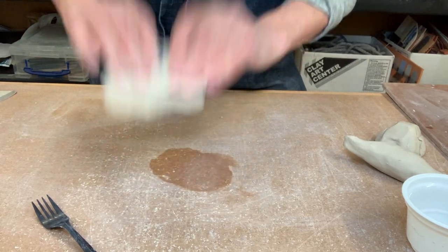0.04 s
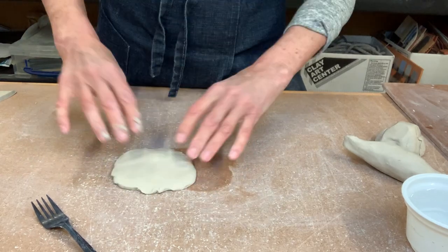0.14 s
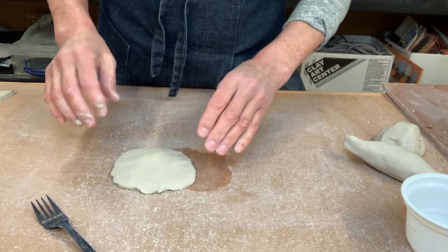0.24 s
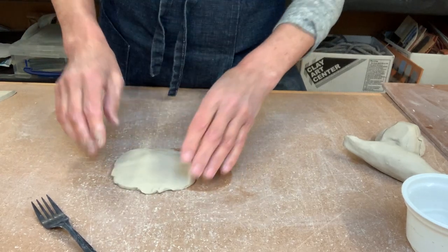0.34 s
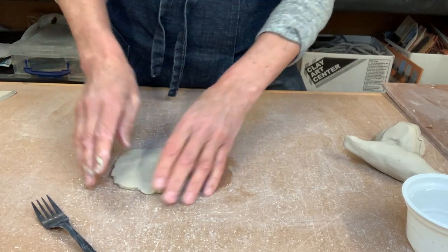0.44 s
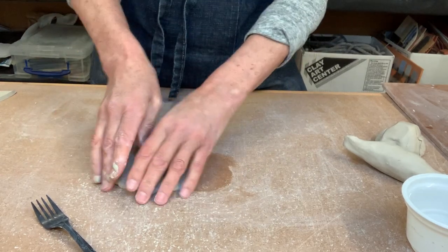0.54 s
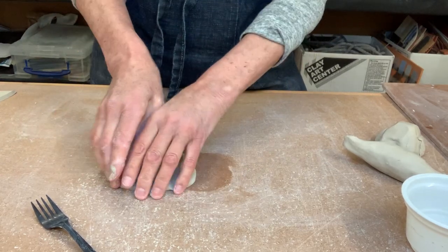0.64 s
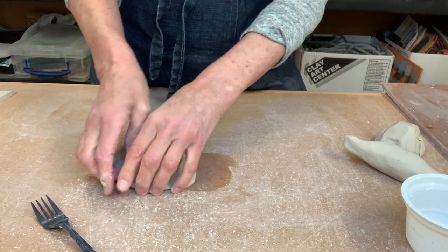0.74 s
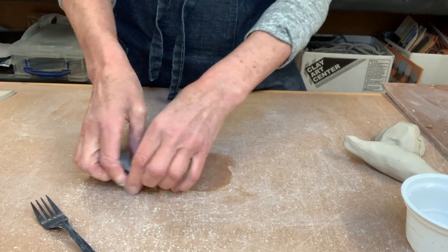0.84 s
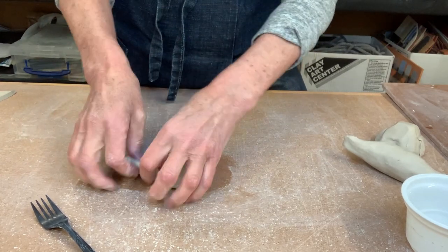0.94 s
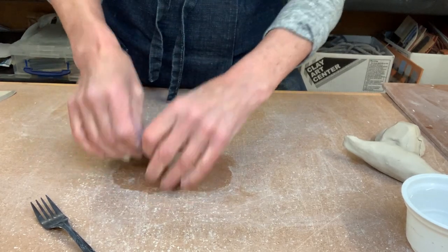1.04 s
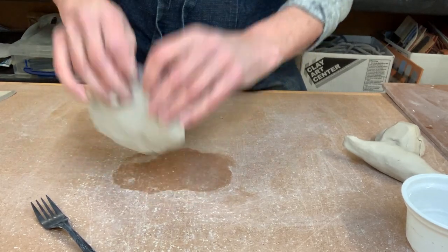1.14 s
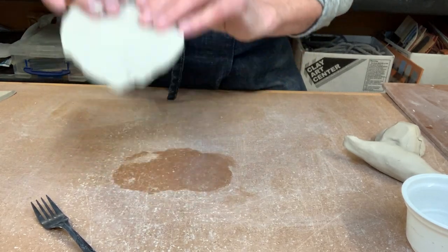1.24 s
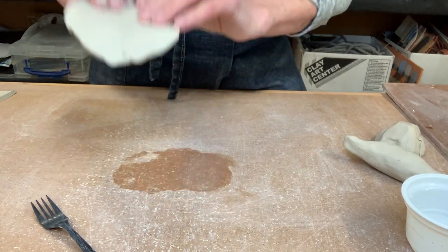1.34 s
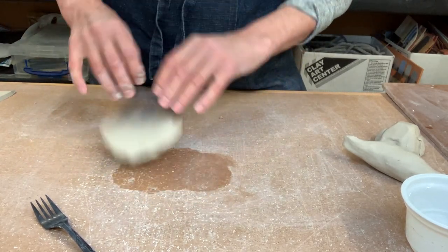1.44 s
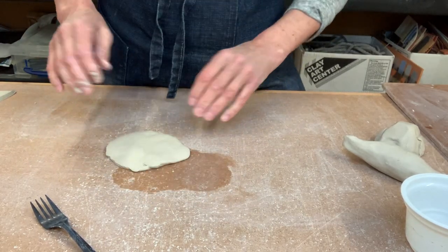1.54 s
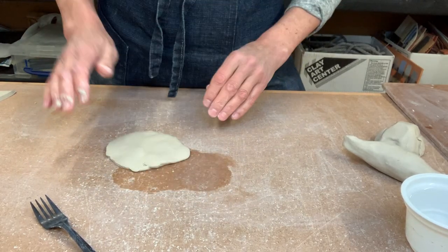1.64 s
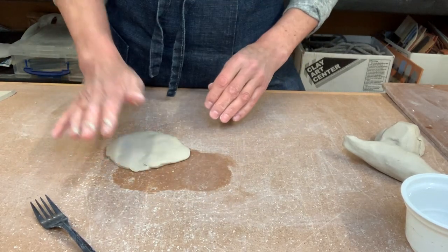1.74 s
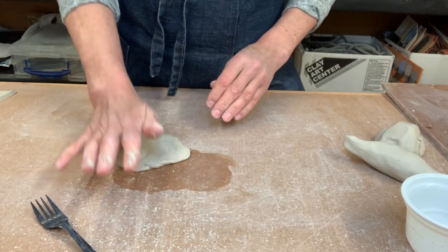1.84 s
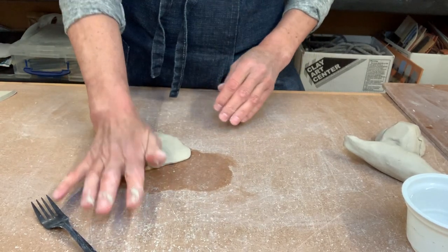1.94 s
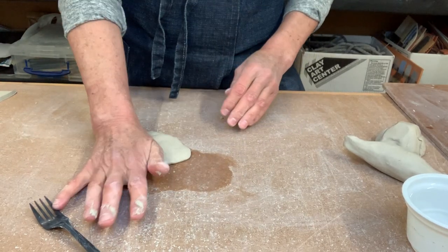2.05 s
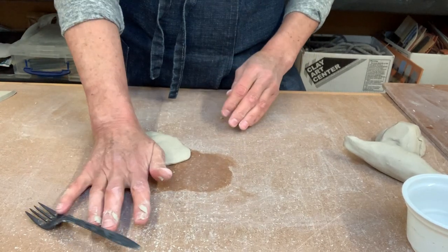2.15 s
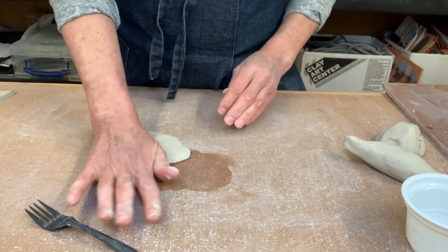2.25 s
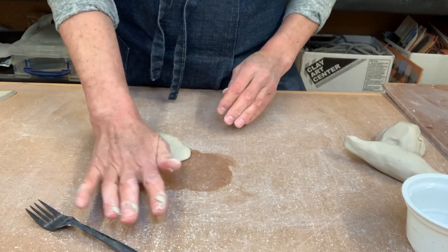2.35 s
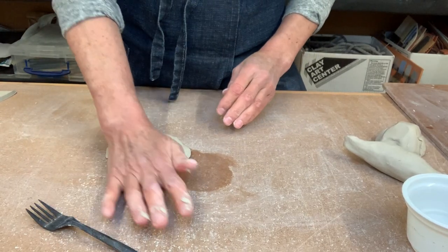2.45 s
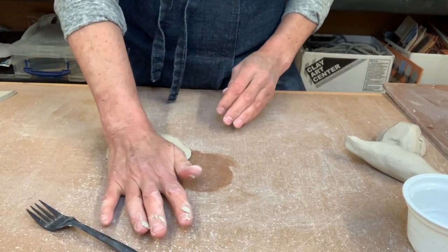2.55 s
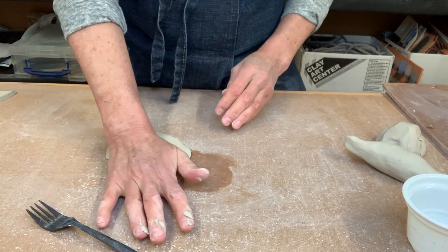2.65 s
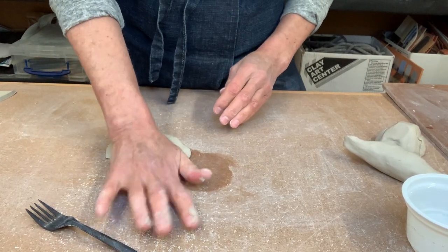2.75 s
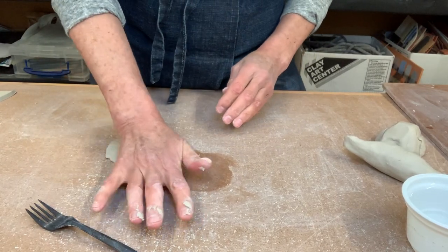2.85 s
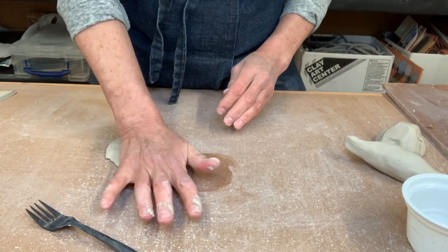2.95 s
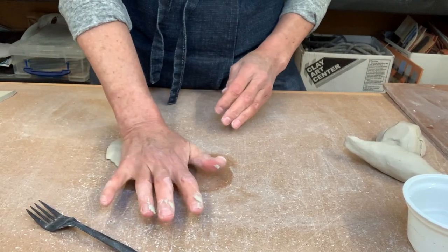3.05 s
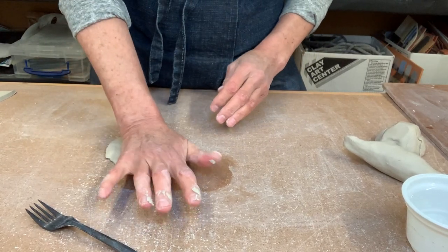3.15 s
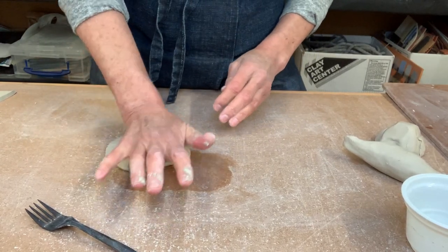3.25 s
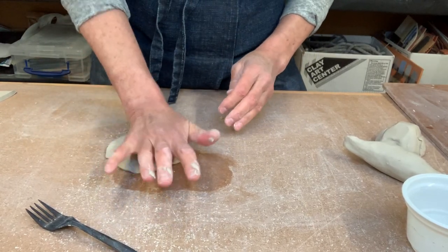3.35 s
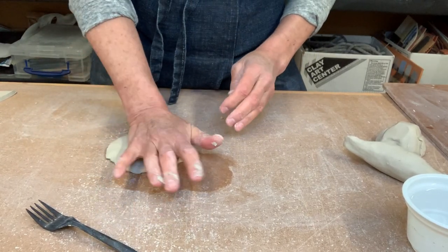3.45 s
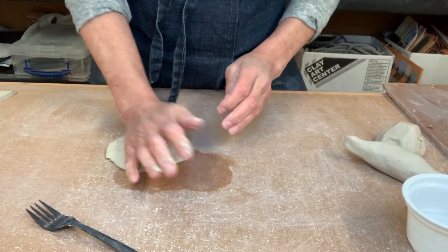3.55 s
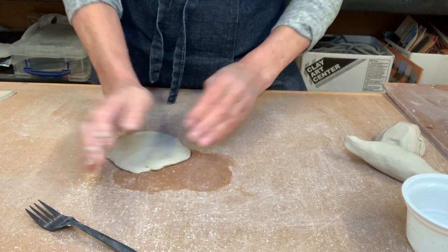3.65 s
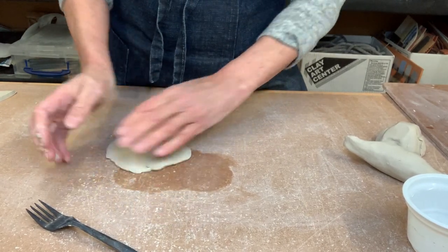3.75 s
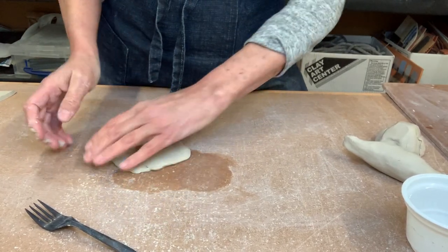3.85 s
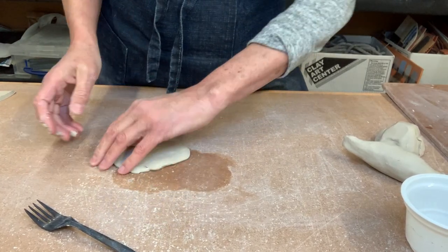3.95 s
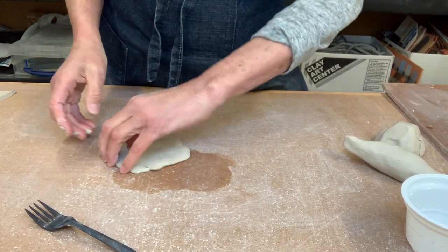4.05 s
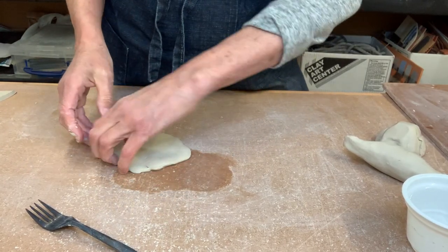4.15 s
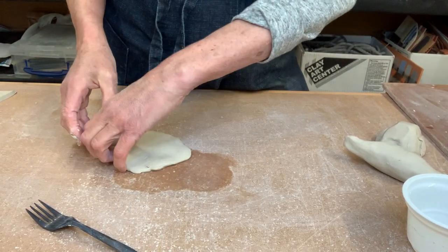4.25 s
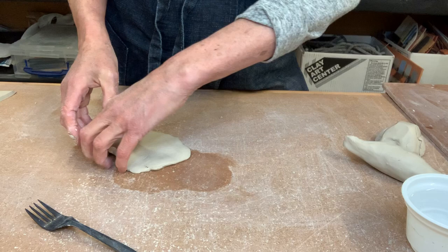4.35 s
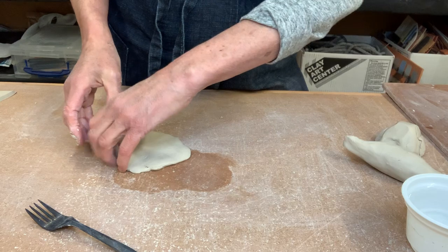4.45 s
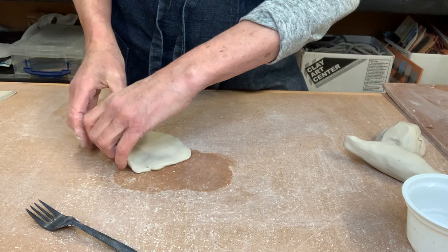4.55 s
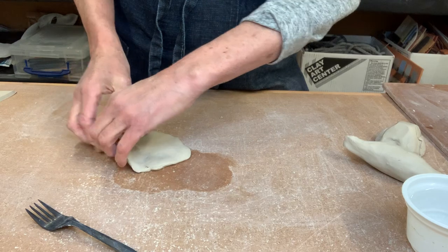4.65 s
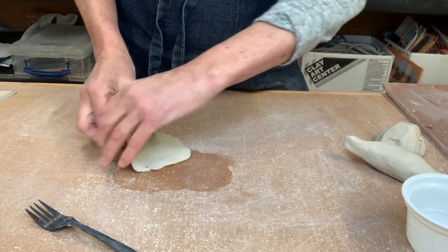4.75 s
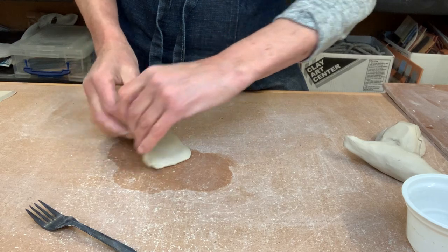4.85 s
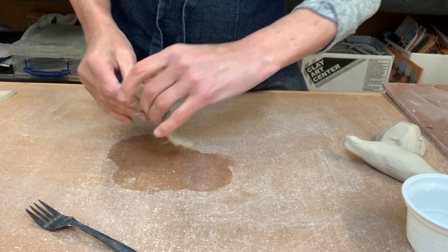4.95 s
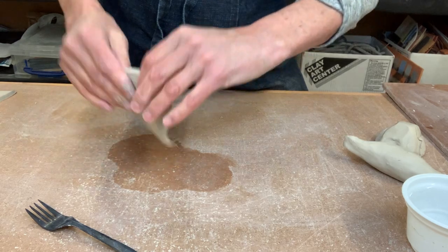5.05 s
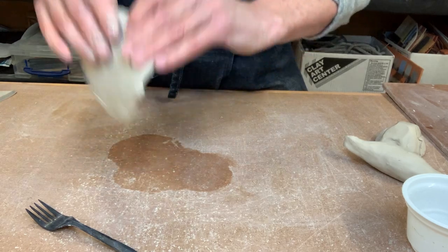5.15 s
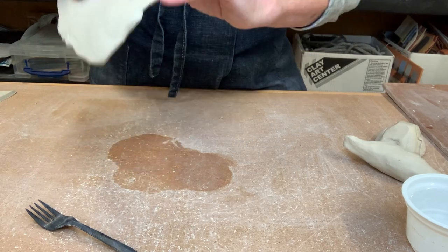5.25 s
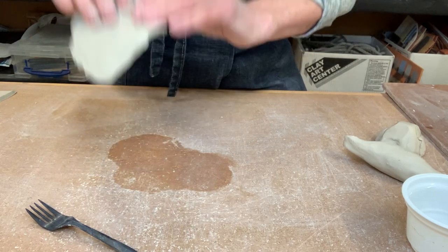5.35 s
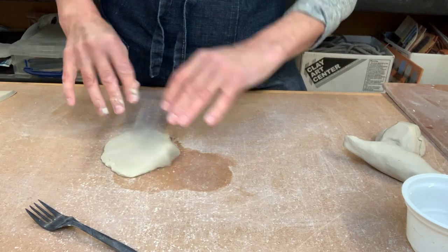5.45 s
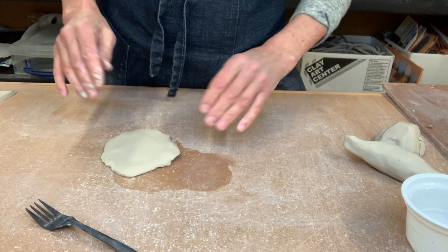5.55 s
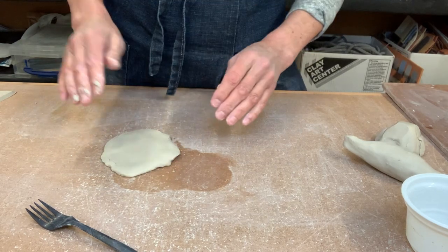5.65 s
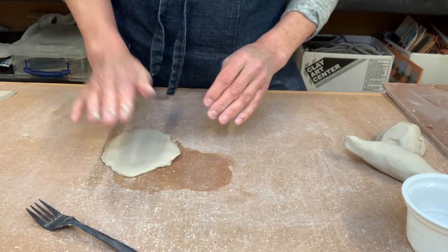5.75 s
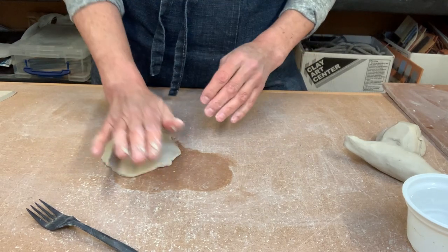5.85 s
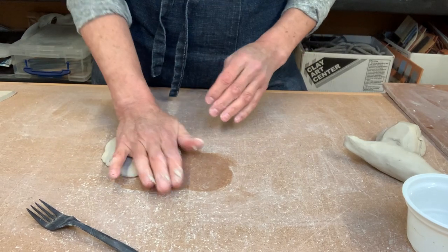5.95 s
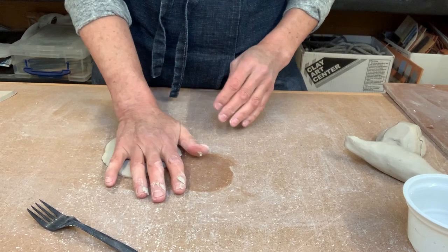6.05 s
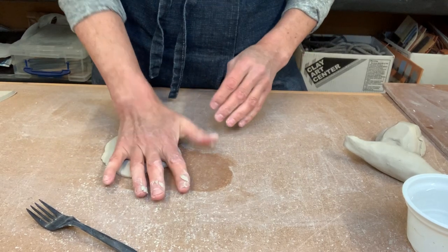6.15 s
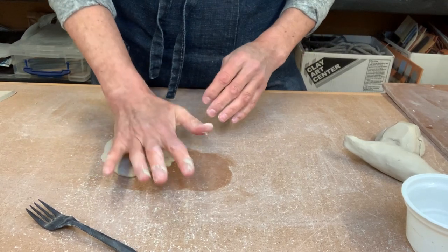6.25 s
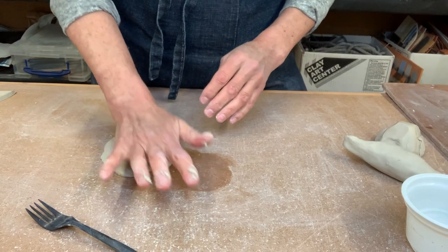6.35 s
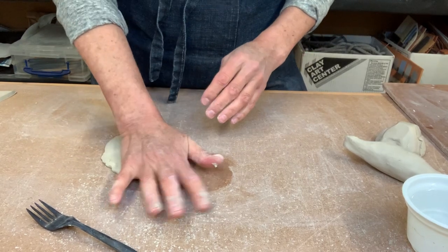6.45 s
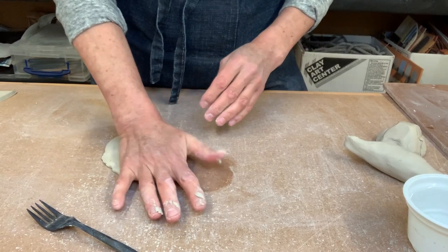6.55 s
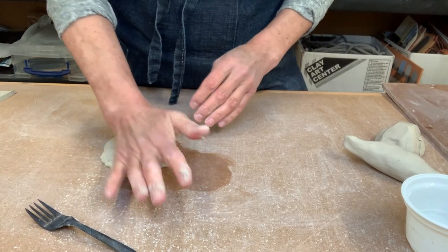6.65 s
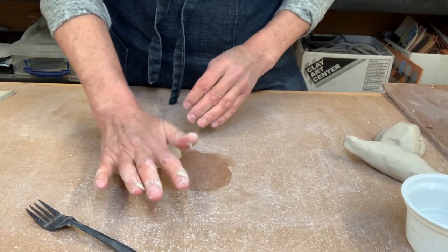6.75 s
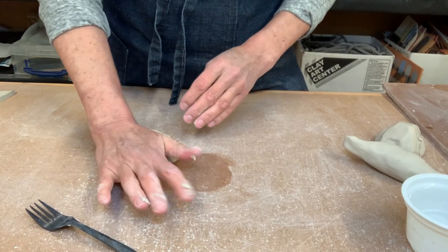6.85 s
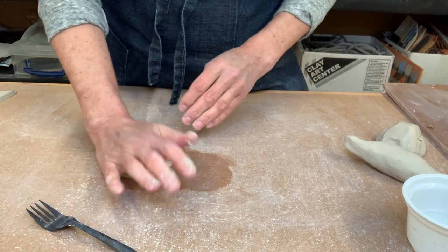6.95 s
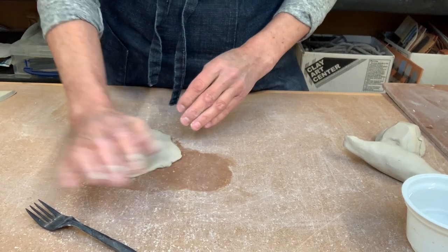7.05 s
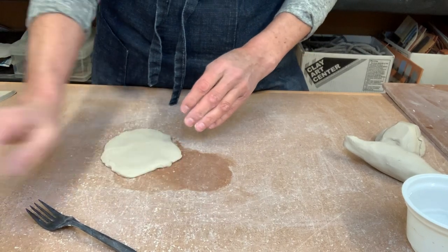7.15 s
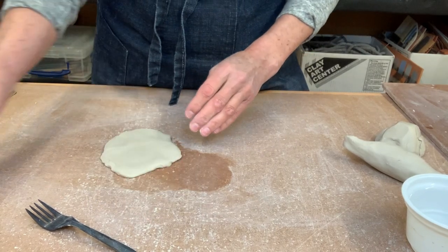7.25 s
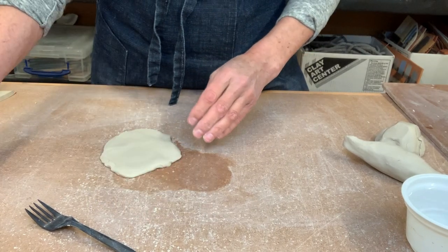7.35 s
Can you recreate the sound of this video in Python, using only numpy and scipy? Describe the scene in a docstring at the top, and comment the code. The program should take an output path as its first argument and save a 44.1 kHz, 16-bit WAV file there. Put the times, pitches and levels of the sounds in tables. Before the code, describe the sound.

A moist clay slab smacks a wooden board three times, booming low, while hands pat, rub and peel it in a small workshop.

```python
"""A slab of moist clay is thrown flat on a wooden work table three times, close by and a little to the left.
Each landing is a noise crack, a bending wave diving in pitch, and decaying modes: board knock and table boom.
Between throws the hand pats, leans, rubs and peels: shaped noise, soft table booms and wavering squeaks.
A finger nudges a fork, which rocks on the board in dry clicks. Behind it all lie the echo of a small workshop
and its low noise floor."""
import sys
import numpy as np
from scipy import signal
from scipy.fft import rfft, irfft, next_fast_len
from scipy.io import wavfile
from scipy.ndimage import uniform_filter1d

SR = 44100
rng = np.random.default_rng(int(sys.argv[2]) if len(sys.argv) > 2 else 0)


def to_wav(s):
    """Save 16-bit WAV."""
    ch = np.atleast_2d(s).T  # columns
    pcm = np.round(np.clip(ch, -1, 1) * 32767)  # PCM
    wavfile.write(sys.argv[1], SR, pcm.astype(np.int16))


N = 326778  # length in samples
T = np.arange(int(.9 * SR)) / SR  # time axis of one event or echo, s


def amp(db):
    """Decibels to gain."""
    return 10 ** (np.asarray(db) / 20)


def unit(x):
    """Scale to rms 1."""
    return x / np.sqrt(np.mean(x ** 2))


def add(track, s, x):
    """Mix x into the track from time s."""
    i = int(round(s * SR))
    track[i:i + len(x)] += x[:len(track) - i]


def along(hz, points, values):
    """Join values by straight lines on a log-frequency axis."""
    return np.interp(np.log(hz + 1), np.log(points), values)


def colour(x, points, size=4096):
    """Causal minimum-phase filter through (f/Hz, level/dB) points."""
    hz, db = np.transpose(points)
    gain = amp(along(np.fft.rfftfreq(size, 1 / SR), hz, db))
    cepstrum = irfft(np.log(gain))
    # folding the cepstrum onto positive time makes the filter causal
    cepstrum[1:size // 2] *= 2
    cepstrum[size // 2 + 1:] = 0
    impulse = irfft(np.exp(rfft(cepstrum)))
    return signal.fftconvolve(x, impulse)[:len(x)]


def hiss(points):
    """Steady noise of one colour, rms 1."""
    return unit(colour(rng.standard_normal(N), points))


def decay(t60):
    """Exponential fade by 60 dB in t60 seconds."""
    return np.exp(-np.log(1000) * T / t60)


def ring(modes, build_cycles):
    """Decaying modes; each takes part of a cycle to build up, so the lows come last."""
    total = 0
    for hz, db, t60 in modes:
        build = 1 - np.exp(-(hz * T / build_cycles) ** 2)
        total = total + amp(db) * np.sin(2 * np.pi * hz * T) * decay(t60) * build
    return total


def swell(ms, sharp):
    """Rises to 1 after ms and dies away, faster with higher sharp."""
    u = T / (ms / 10 ** 3)
    return (u * np.exp(1 - u)) ** sharp


def arch(length_s, skew=1):
    """A stroke that fades in and out; skew above 1 moves its peak towards the end."""
    return np.sin(np.pi * np.linspace(0, 1, int(length_s * SR)) ** skew)


def burst(shape, size=2048, count=3):
    """Countless tiny contacts under one envelope: a noise burst with a nearly even spectrum."""
    shape = shape[:size]
    x = rng.standard_normal(size)
    for _ in range(count):
        # keep only the phases, so every frequency gets equal strength
        phase = np.angle(rfft(x * np.sqrt(shape)))
        x = irfft(np.exp(1j * phase))
    return x * (shape > shape.max() / 1000) * np.linalg.norm(shape)


def lead_in(rise_s):
    """Envelope of a faint noise that grows louder up to the contact."""
    return np.exp(-T[:SR // 20] / rise_s)[::-1]


def bending_wave(hz, glide_s, peak_ms):
    """High notes run through the board fastest, so the pitch dives."""
    pitch = hz / (1 + (T / glide_s) ** 2)
    return np.sin(2 * np.pi * np.cumsum(pitch) / SR) * swell(peak_ms, 3.3)


def boom(table, push_ms):
    """A push rings the table; the longer it lasts, the duller the boom."""
    u = np.arange(2048) / SR / (push_ms / 10 ** 3)
    push = np.sin(np.pi * np.minimum(u, 1)) ** 2
    return signal.fftconvolve(table, push / push.sum())


# The workshop's echo by band: f/Hz, level/dB, t60/s, left-right likeness (-1 to 1, clipped beyond)
ROOM = [(60, -16.5, 0.36, 0.8), (154, -11, 1, 0.81), (300, -9, 0.25, 0.61), (630, -10.5, 0.19, -0.42),
        (1390, -11, 0.36, -0.09), (2830, -5, .33, 0.35), (5450, -5.5, 0.41, -0.4), (8960, -11, 0.54, -1.1),
        (11465, -9.5, 0.15, 0.8), (15000, -10.5, 0.16, -0.36)]


def pair(n):
    """Left and right noise of a diffuse field, with its own left-right likeness in each band."""
    hz, _, _, likeness = np.transpose(ROOM)
    c = np.clip(along(np.fft.rfftfreq(n, 1 / SR), hz, likeness), -1, 1)
    mid, side = rfft(rng.standard_normal((2, n))) * np.sqrt([(1 + c) / 2, (1 - c) / 2])
    return irfft(np.array([mid + side, mid - side]), n)


# Colour of the workshop's background, relative: f/Hz, level/dB per Hz
FLOOR = [(20, 4), (55, 1.5), (123, -2.5), (180, -8), (277, -10), (400, -18), (500, -22), (1000, -26.5),
         (2000, -32.5), (6200, -36.5), (8200, -40), (10000, -38), (13500, -40.5), (16000, -55)]


def background(floor_db=-64):
    """Steady, mostly low noise of the workshop, spread around the microphones as a diffuse field."""
    return amp(floor_db) * unit(np.array([colour(side, FLOOR) for side in pair(N)]))


def reflections(size, early_db=-17, nearest_s=.004, farthest_s=0.023, count=6):
    """A few distinct echoes from the apron, the arms and the nearest shelves."""
    echo = np.zeros((2, size))
    for side, lags in zip(echo, rng.uniform(nearest_s, farthest_s, (2, count))):
        for lag in lags:
            add(side, lag, amp(early_db) * np.array([1, 2, 1]) / 4)  # slightly dulled
    return echo


def workshop(x, build_s=.003, late_db=-32, late_t60_s=0.96, late_top_hz=4000):
    """Dense echoes off shelves and walls, with a faint, duller, slow-dying ring behind them."""
    hz, db, t60, _ = np.transpose(ROOM)
    field, bins = rfft(pair(len(T))), np.fft.rfftfreq(len(T), 1 / SR)
    build = 1 - np.exp(-(T / build_s) ** 2)
    echo = 0
    for k, share in enumerate(np.eye(len(hz))):
        late = amp(late_db) / (1 + (hz[k] / late_top_hz) ** 4) * decay(late_t60_s)
        fade = (decay(t60[k]) + late) * build
        band = irfft(field * along(bins, hz, share), len(T))
        echo = echo + amp(db[k]) * fade / np.linalg.norm(fade) * band
    return signal.fftconvolve(x[None], echo + reflections(len(T)), axes=1)[:, :N]


# Path to the right side compared with the left: f/Hz, level/dB, phase lag/rad
SHADE = [(59.6, 1.5, -0.1), (205, 1, -0.94), (324, -2.5, 1.94), (504, -9, 1.0), (750, -8, 0.88),
         (1210, -4, 1.15), (2446, -2.5, 2.0), (4100, -3.5, 5), (6170, 1, 4.5), (8430, -1, 3),
         (11500, 0.5, 1.1), (15500, -1, -2.5)]


def right_side(x):
    """The work lies a little left: the right side hears it out of step, and weaker most of all in the low mids."""
    hz, db, lag = np.transpose(SHADE)
    size = next_fast_len(N + len(T))
    bins = np.fft.rfftfreq(size, 1 / SR)
    path = amp(along(bins, hz, db)) * np.exp(-1j * along(bins, hz, lag))
    return irfft(rfft(x, size) * path, size)[:N]


# A soft swish while the hands move in: t/s, length/s, level/dB
SWISHES = [(0.447, 0.163, -76), (0.877, 0.14, -75), (3.723, 0.36, -68), (5.827, 0.31, -70)]
# Colour of the swish: f/Hz, level/dB
SWISH_COLOUR = [(400, -7), (1000, -1.5), (1700, 3.5), (3200, 0), (4700, -7.5), (8000, -14.5), (14000, -17)]


def swishes():
    """Moving hands: coloured noise that fades in and out."""
    level = np.zeros(N)
    for s, length_s, db in SWISHES:
        add(level, s, amp(db) * arch(length_s))
    return level * hiss(SWISH_COLOUR)


# Damp skin squeaks: t/s, f/Hz, level/dB
SQUEAKS = [(0.473, 3520, -61), (6.421, 3300, -65), (6.467, 1950, -53), (6.468, 3450, -63),
           (6.484, 1950, -63), (7.277, 9800, -63)]


def squeaks(waver=0.039):
    """Damp skin squeaks: a brief tone whose pitch wavers at random."""
    track = np.zeros(N)
    for s, hz, db in SQUEAKS:
        wander = unit(uniform_filter1d(rng.standard_normal(len(T)), size=40))
        pitch = hz * (1 + waver * wander)
        add(track, s, amp(db) * swell(3.7, 2.3) * np.sin(2 * np.pi * np.cumsum(pitch) / SR))
    return track


def scuffs(length_s, per_s=20, scuff_s=0.01, spread_db=4, steady=0.61):
    """A light steady rub with short scuffs at uneven moments."""
    level, count = steady * arch(length_s), int(np.ceil(length_s * per_s))
    for k, (when, size) in enumerate(rng.random((count, 2))):
        start = (k + when) / count * (length_s - scuff_s)
        add(level, start, amp(spread_db * (2 * size - 2)) * arch(scuff_s))
    return level


# Colour of the tacky crackle: f/Hz, level/dB
TACK_COLOUR = [(300, 4.5), (1500, 2), (3500, 1.5), (5500, -0.5), (8300, -0.5), (11000, -7), (14500, -5),
               (16500, -17)]


def tacky_crackle():
    """Tiny sticky bonds snap one by one: sparse clicks of uneven strength, rms 1."""
    strength = amp(4 * np.minimum(rng.exponential(size=N), 4))
    snaps = (rng.random(N) < .05) * rng.standard_normal(N) * strength
    return unit(colour(snaps, TACK_COLOUR))


# The clay peels off the board or the palm: t/s, length/s, rub level/dB, tacky crackle level/dB
PEELS = [(1.07, .088, -61.5, -66), (2.801, .032, -66.5, -60.5), (3.247, 0.045, -62.5, -66),
         (4.328, .05, -60, -59), (4.519, .045, -50.5, -57), (6.255, 0.042, -74, -69.5)]
# Fingertips feel about on the clay, or clay peels softly without a thud:
# t/s, length/s, rub level/dB, tacky crackle level/dB
SOFT_TOUCHES = [(0.595, 0.48, -75, -82.5), (1.03, 0.058, -64, -76.5), (4.051, 0.097, -74.5, -89.5),
                (4.743, 0.21, -75.5, -90), (4.922, 0.08, -67.5, -75), (6.199, 0.063, -67.5, -73.5),
                (6.635, 0.13, -71.5, -72), (6.98, 0.15, -75.5, -90.5)]
# Colour of the rub: f/Hz, level/dB
RUB_COLOUR = [(150, -8), (450, -1.5), (650, -2), (830, 6), (1150, -2.5), (1600, -4), (3000, -17.5),
              (5500, -23.5), (9000, -33), (16000, -31)]


def handling(table, peel_skew=2.1, release_share=.7, release_db=-51, release_ms=4.8):
    """Rubs and snapping sticky bonds; in a full peel the clay lets go and the board springs back, booming softly."""
    rub, tack, thuds = np.zeros((3, N))
    for s, length_s, rub_db, tack_db in PEELS:
        stroke = arch(length_s, peel_skew)
        add(rub, s, amp(rub_db) * stroke)
        add(tack, s, amp(tack_db) * stroke)
        add(thuds, s + release_share * length_s, amp(release_db) * boom(table, release_ms))
    for s, length_s, rub_db, tack_db in SOFT_TOUCHES:
        touch = scuffs(length_s)
        add(rub, s, amp(rub_db) * touch)
        add(tack, s, amp(tack_db) * touch)
    return rub * hiss(RUB_COLOUR) + tack * tacky_crackle() + thuds


# The hand leans on the clay: t/s, level/dB
LEANS = [(0.524, -46.5), (0.971, -54), (2.094, -48.5), (2.559, -47), (3.212, -50.5), (3.67, -46.5),
         (3.974, -42), (6.22, -50), (6.677, -43)]


def leans(table, push_ms=7.5):
    """Slow pushes give a soft thud without a smack."""
    thuds, thud = np.zeros(N), boom(table, push_ms)
    for s, db in LEANS:
        add(thuds, s, amp(db) * thud)
    return thuds


# The fork knocks on the board, relative: t/s, level/dB
FORK_KNOCKS = [(2.136, -47.5), (2.289, -32.5), (2.3464, -35.5), (2.3773, -45.5), (2.3950, -58)]
# Colour of its click: f/Hz, level/dB
CLICK_COLOUR = [(150, -11.5), (550, 0.5), (1000, 11), (1350, 16.5), (2000, 6.5), (2600, 5), (3600, 15),
                (4700, -9), (5800, -0.5), (8000, -1.5), (10300, 8.5), (12500, -9), (16000, 1)]
# Colour of the noise that leads into a contact (scrape, graze or rushing air): f/Hz, level/dB
LEAD_IN_COLOUR = [(100, -2.5), (900, -1), (2000, -3.5), (5000, -11.5), (9000, -20), (16000, -29.5)]


def fork(gain_db=3):
    """Tines and handle click on the board without ringing on; a scrape swells just before each knock."""
    taps, scrape = np.zeros((2, N))
    slide = lead_in(0.0055)
    for s, db in FORK_KNOCKS:
        add(taps, s, amp(db) * burst(swell(0.59, 0.72)))
        add(scrape, s - len(slide) / SR, amp(db - 17) * slide)
    return amp(gain_db) * (colour(taps, CLICK_COLOUR) + scrape * hiss(LEAD_IN_COLOUR))


# What the fork sends into the room: f/Hz, level/dB
FORK_ECHO = [(700, 4), (2300, -6.5), (3600, -14), (5500, -2), (10000, -9)]


def fork_echo(clicks):
    """The fork's clicks, recoloured on their way into the room, leave a fainter late ring."""
    return workshop(colour(clicks, FORK_ECHO), late_db=-45)


# Palm and fingers come down; the row at 4.336 is the snap that starts a peel.
# Relative: t/s, smack level/dB, bending wave level/dB, weight on table level/dB
PATS = [(3.01, -63.5, -56, -40.5), (3.4609, -45, -43, -25.5), (3.59, -57.5, -65.5, -58.5),
        (4.336, -53.5, -63, -58.5), (6.0348, -42.5, -51.5, -35), (6.5096, -35.5, -34, -26.5),
        (6.837, -56.5, -66.5, -69), (6.9062, -41.5, -41.5, -28.5)]
# Colour of the smack: f/Hz, level/dB
SMACK_COLOUR = [(150, -4.5), (550, 8), (1300, 7), (2500, 10.5), (4000, -1), (7000, -3), (11000, -1.5),
                (16000, 13)]


def pats(table, boom_lag_s=0.0013, graze_db=-19, push_ms=11, firm_db=-40, firm_top_hz=5500, db_per_octave=15):
    """A faint noise swells into a smack, brighter the louder it is; then the board bends and the table booms."""
    smack, graze, body = np.zeros((3, N))
    graze_swell = lead_in(0.0064)
    for s, smack_db, wave_db, weight_db in PATS:
        top_hz = firm_top_hz * 2 ** ((smack_db - firm_db) / db_per_octave)
        lowpass = signal.butter(2, min(top_hz, .45 * SR), fs=SR)
        contact = burst(swell(0.53, 0.71) + amp(-32.0) * swell(1.0, 1.0))
        add(graze, s - len(graze_swell) / SR, amp(smack_db + graze_db) * graze_swell)
        add(smack, s, amp(smack_db) * signal.lfilter(*lowpass, contact))
        add(body, s, amp(wave_db - 1.5) * bending_wave(800, glide_s=0.0057, peak_ms=7.3))
        add(body, s + boom_lag_s, amp(weight_db) * boom(table, push_ms))
    return colour(smack, SMACK_COLOUR) + graze * hiss(LEAD_IN_COLOUR) + body


# What the table booms with: f/Hz, level/dB, t60/s
TABLE_MODES = [(56, -5.5, 0.41), (85.5, -13, 0.51), (97.5, -8, 0.28), (108.7, -3.5, 0.17), (122, -13, .38),
               (156.8, -11, 0.22), (179, -9, 0.15), (208, -9, 0.13), (235, -5, 0.12), (259, -4.5, 0.14),
               (327, -10.5, .08)]


def table_ring():
    """The wooden table's low modes, each building up within part of a cycle."""
    return ring(TABLE_MODES, build_cycles=0.39)


def under_hand(table, hold_s=0.12, rest_db=-12, weight_db=2):
    """A hand resting on the table cuts its boom short."""
    return amp(weight_db) * table * (amp(rest_db) + np.exp(-(T / hold_s) ** 4))


# The slab lands, sometimes one edge first:
# t/s, crack level/dB, contact/ms, bending wave level/dB, its starting f/Hz, table boom level/dB
SLAPS = [(0.1864, -24, 3.6, -17.5, 1244, -39.5), (0.1901, -17, 1.5, -16, 1403, -30.5),
         (0.2, -23.5, 2.77, -13, 1322, -17), (1.554, -12.5, 2.9, -7, 1600, -12.5),
         (5.5391, -27.5, 2.6, -29, 1300, -50.5), (5.5444, -11, 1.67, -6, 1782, -13)]
# Colour of the wet crack: f/Hz, level/dB
CRACK_COLOUR = [(150, -9), (500, -1), (1000, 10), (2200, 6.5), (3500, 2), (6000, -0.5), (8000, 0),
                (10500, 3), (14000, 0.5), (16000, -3.5)]
# The board knocks under the slab: f/Hz, level/dB, t60/s
KNOCK_MODES = [(510, -2.5, 0.05), (858, 3.5, 0.018), (1030, 4.5, 0.009), (1255, -5, .025),
               (1820, -2.5, 0.048), (2194, -13.5, 0.04), (2660, -6, 0.033)]


def slaps(table, air_db=-19, air_rise_s=0.0013, knock_db=-11, knock_lag_s=.0017, boom_lag_s=.002):
    """Air rushes out under the slab, the wet face cracks shut, the board bends, knocks and booms."""
    crack, air, body = np.zeros((3, N))
    rush, knock = lead_in(air_rise_s), ring(KNOCK_MODES, build_cycles=1.0)
    for s, crack_db, contact_ms, wave_db, wave_hz, boom_db in SLAPS:
        add(air, s - len(rush) / SR, amp(crack_db + air_db) * rush)
        add(crack, s, amp(crack_db) * burst(swell(contact_ms / 2, 1.0)))  # peaks halfway
        board = bending_wave(wave_hz, glide_s=.0026, peak_ms=2.4) + amp(knock_db) * knock
        add(body, s + knock_lag_s, amp(wave_db) * board)
        add(body, s + boom_lag_s, amp(boom_db) * boom(table, push_ms=3.4))
    return colour(crack, CRACK_COLOUR) + air * hiss(LEAD_IN_COLOUR) + body


def scene(hand_room_db=-4):
    """The slab cracks freely into the room; the hand covers its own smacks, so they send less echo."""
    table = table_ring()
    held = under_hand(table)
    hands = swishes() + squeaks() + handling(held) + leans(held) + pats(held)
    clicks = fork()
    slab = slaps(table)
    near = slab + hands + clicks
    echo = workshop(slab + amp(hand_room_db) * hands) + fork_echo(clicks)
    return np.array([near, right_side(near)]) + echo + background()


def record(dry, low_hz=35, top_hz=16200):
    """The microphone loses the deepest bass, the highest peaks are rounded and the top is cut."""
    sound = signal.sosfilt(signal.butter(2, low_hz, "high", fs=SR, output="sos"), dry)
    rounded = sound / (1 + sound ** 6) ** (1 / 6)
    return signal.sosfilt(signal.ellip(8, .2, 70, top_hz, fs=SR, output="sos"), rounded)


dry = scene()
out = record(dry)
to_wav(out)
```